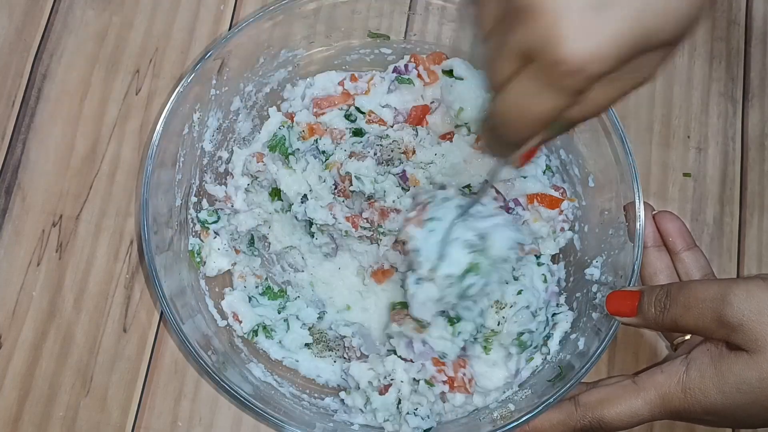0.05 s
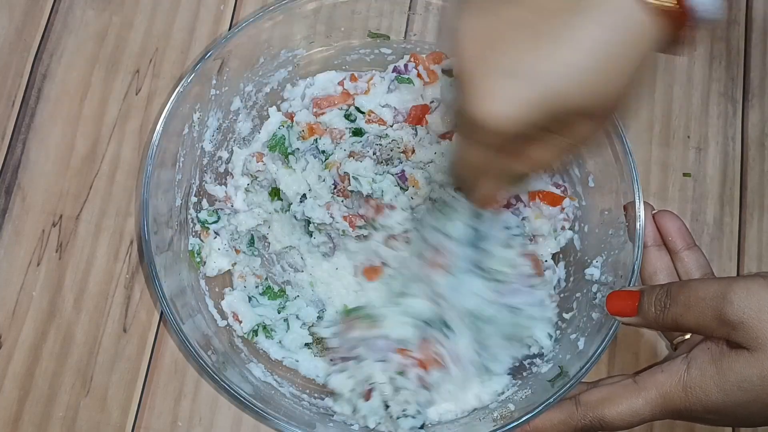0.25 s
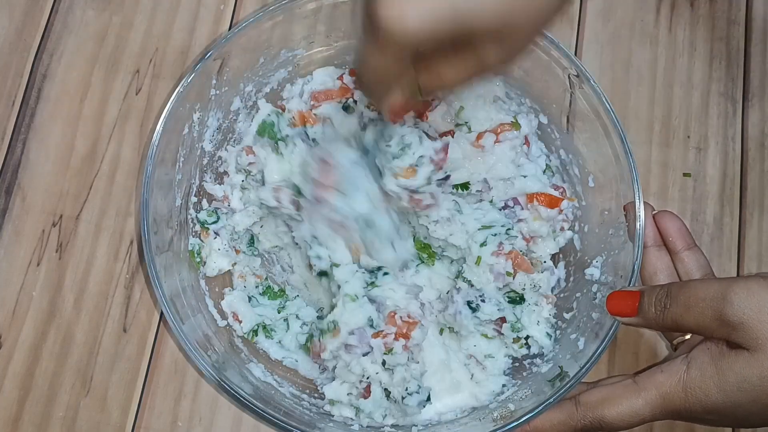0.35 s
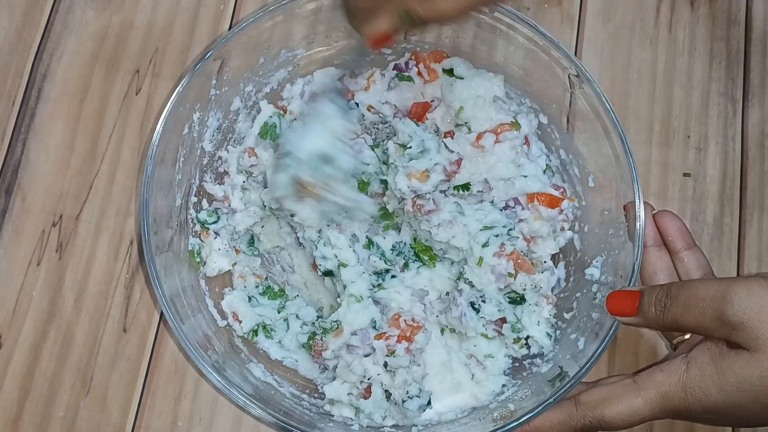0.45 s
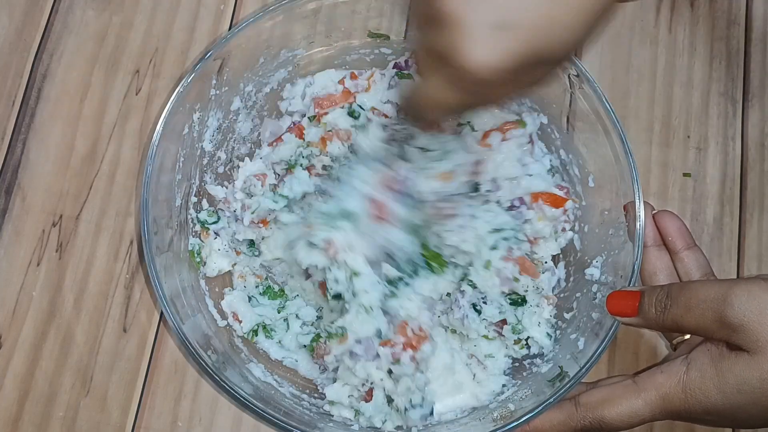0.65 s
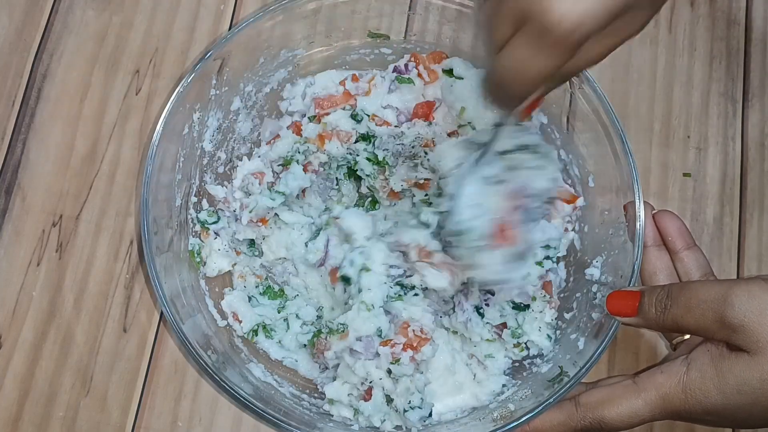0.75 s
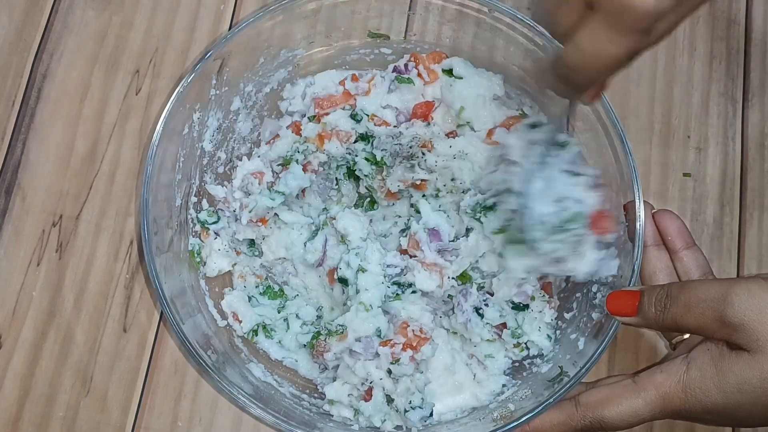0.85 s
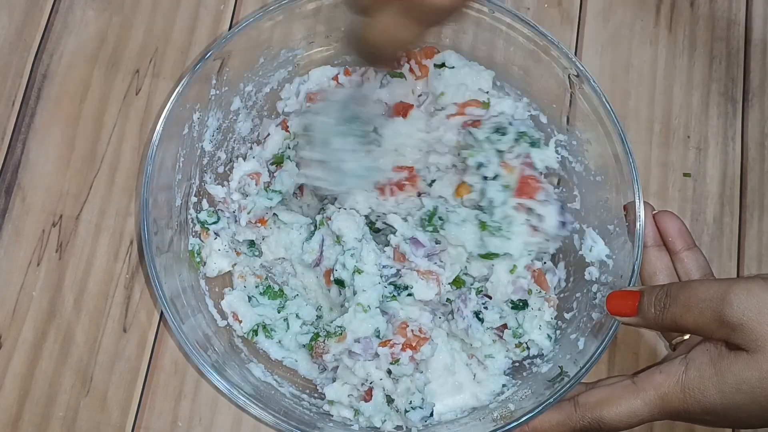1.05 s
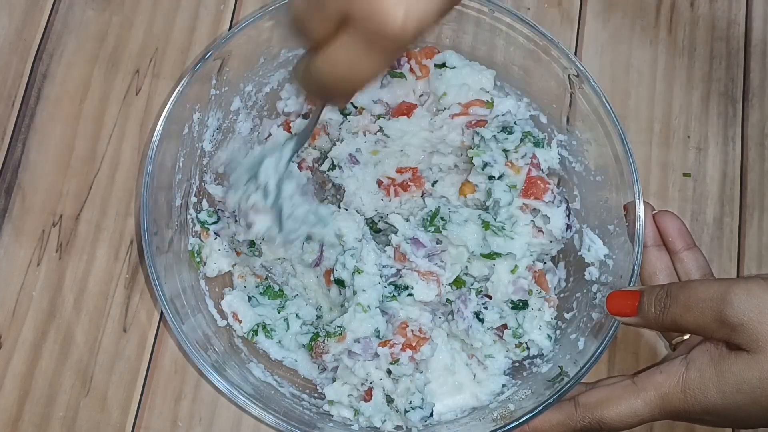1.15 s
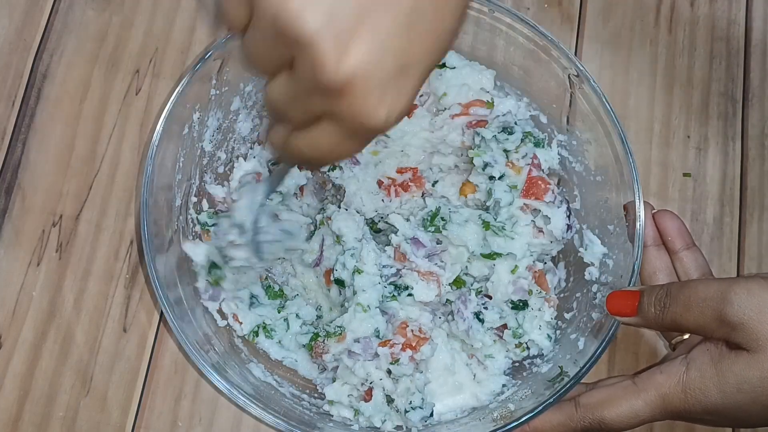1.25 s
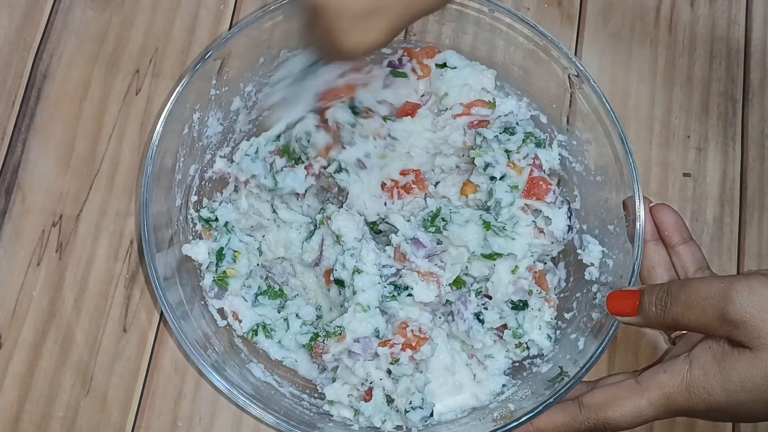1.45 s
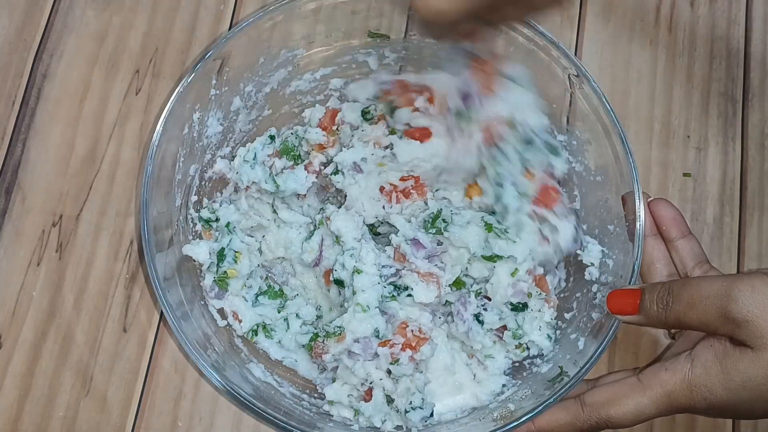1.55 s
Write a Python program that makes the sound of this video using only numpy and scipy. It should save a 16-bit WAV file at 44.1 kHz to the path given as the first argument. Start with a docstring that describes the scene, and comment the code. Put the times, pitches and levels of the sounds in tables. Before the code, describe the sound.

A metal spoon squelches through thick wet batter and clinks against a glass bowl.

```python
"""A metal spoon in thick wet batter and chopped vegetables, in a glass bowl on a wooden table.
The microphone is close above, in a small kitchen. Stirring opens with a squelch; at 0.23 s the
spoon strikes the glass once, hard, and the bowl rings and bumps the table. Soft strokes follow,
tearing wet films and popping air pockets. Around 1 s air gulps in under the lifting spoon;
near the end come more dull bumps and two faint ticks on the glass."""
import sys
import numpy as np
from scipy import signal
from scipy.fft import rfft, irfft
from scipy.io import wavfile

SR = 44100
rng = np.random.default_rng(int(sys.argv[2]) if len(sys.argv) > 2 else 0)


def master_out(mix):
    """Clip the mix to full scale and print it as 16-bit PCM to the path in sys.argv[1]."""
    frames = np.transpose(np.atleast_2d(mix))
    ceiling = np.clip(frames, -1, 1)
    pcm = np.round(ceiling * 32767).astype(np.int16)
    wavfile.write(sys.argv[1], SR, pcm)


N = 70560
T = np.arange(N) / SR

# The kitchen's reverberation. Each row: frequency in Hz, t60 in seconds.
ROOM_DECAY = [(100, 0.28), (500, 0.45), (1500, 0.35), (4000, 0.32), (9000, 0.49), (16000, 1)]
# Noise at the microphone. Each row: frequency in Hz, left-right correlation.
CORRELATION = [(30, .7), (100, 0.0034), (250, 1), (600, 0), (3000, 0.9), (16000, 0)]
# Spectra of room hiss, bowl on wood, squashed and torn batter, the strike and its echo.
# Each row: frequency in Hz, relative density in dB.
HISS_SPECTRUM = [(30, 7), (300, 8.5), (700, 5), (2000, -0.5), (8000, -5.5), (16000, -1)]
RUMBLE_SPECTRUM = [(20, -32.5), (45, -19), (80, -2), (130, -3.5), (180, -14.5), (300, -17), (500, -19.5),
                   (700, -35), (2000, -45), (16000, -75.5)]
SQUELCH_SPECTRUM = [(100, -13), (280, -4.5), (480, -13.5), (750, 0), (1000, -6), (1350, -1.5), (1650, -7),
                    (2050, -2), (3000, -12.5), (5000, -27), (16000, -44)]
CRACKLE_SPECTRUM = [(200, -25), (1500, -22), (2800, 1.5), (4200, -2.5), (6500, -0.5), (7500, -1.5),
                    (8200, -9.5), (11000, -4), (14000, -5), (16000, -5)]
CRACK_SPECTRUM = [(40, -27.5), (120, -9.5), (450, -10.5), (1200, -4.5), (2000, -6), (3500, 7.5),
                  (6000, 2.5), (8000, -2), (10000, 2.5), (16000, -10)]
ECHO_SPECTRUM = [(40, -19), (120, -3.5), (250, 1), (480, -7.5), (1000, -0.5), (2000, -2), (2400, -10),
                 (3300, 1.5), (5300, -10), (7800, -12), (10000, -13.5), (16000, -29)]
# The bowl sliding on the table. Each row: time in seconds, level in dB.
SLIDE_LEVELS = [(0, -52), (.09, -56.5), (.17, -60), (.4, -55), (.5, -67.5), (.56, -61.5), (.63, -65.5),
                (.7, -54), (.9, -55.5), (1.15, -52), (1.2, -58), (1.32, -62.5), (1.45, -50.5), (1.6, -65)]
# The bowl bumping it. Each row: start in seconds, level in dB, pitch in Hz, rise and t60 in seconds.
TABLE_BUMPS = [(0.232, -27.5, 134.3, 0.0015, 0.21), (0.235, -34.5, 82.5, 0.012, 0.45),
               (0.679, -46.5, 88.2, 0.0099, 0.3), (0.772, -49, 81.5, 0.017, 0.61),
               (0.79, -49, 127.6, 0.031, 0.54), (1.1, -28.5, 79.3, 0.037, 0.22),
               (1.406, -33.5, 251, 0.0022, 0.056), (1.406, -41.5, 97.5, 0.0037, 0.36),
               (1.408, -34.5, 137.6, 0.012, 0.27), (1.551, -27, 187, 0.0047, 0.032),
               (1.576, -28.5, 92, 0.032, 0.28)]
# Rubbed glass. Each row: start and length in seconds, level in dB, pitch in Hz.
RUB_TONES = [(0.795, 0.445, -61, 1307), (1.307, 0.11, -61.5, 478)]
# Air drawn under the spoon. Each row: start in seconds, gain in dB.
GULPS = [(0.9135, -40.5), (0.9405, -37.5), (0.997, -37.5), (1.012, -31.5), (1.0257, -28), (1.033, -35.5)]
# Modes of the hollow under the spoon, and of the spoon itself.
# Each row: pitch in Hz, relative level in dB, t60 in seconds, left over right in dB.
HOLLOW_MODES = [(1374, -11, 0.03, 0.0065), (1973, -9.5, 0.059, 0.0068), (2164, -5.5, 0.028, 0)]
SPOON_MODES = [(1883, -12, 0.04, 0), (2960, -18, 0.01, 0.5), (3326, -13.5, 0.013, -1.5),
               (3487, -14, 0.025, 2), (4460, -20.5, 0.0081, -2)]
# Bursting air. Each row: start in seconds, tone gain in dB, pitch in Hz, snap gain in dB.
AIR_POCKETS = [(.006, -29, 4400, -39.5), (0.079, -41.5, 2700, -73), (.175, -38, 10100, -48),
               (0.349, -24, 3000, -51), (0.396, -35.5, 5360, -40.5), (0.4218, -27.5, 10300, -34.5),
               (0.4608, -23.5, 5920, -35.5), (.469, -23, 6500, -42), (0.549, -27.5, 5170, -68),
               (0.6322, -34.5, 6200, -45), (0.65, -69.5, 5450, -39), (0.6661, -34.5, 2034, -55),
               (0.687, -29, 8300, -48), (0.7136, -40, 1260, -36.5), (0.7445, -28.5, 1530, -39),
               (0.7504, -32.5, 4010, -41), (0.913, -33, 4900, -44), (.981, -37, 6400, -60.5),
               (.989, -37, 8700, -43), (1.01, -37.5, 5300, -39), (1.026, -25, 2840, -54),
               (1.087, -28.5, 6450, -43), (1.357, -35.5, 5350, -54), (1.4047, -27.5, 2620, -33),
               (1.445, -26, 2750, -53), (1.495, -31.5, 6600, -53), (1.536, -28, 4000, -38),
               (1.5515, -29, 1380, -32.5), (1.563, -35, 1370, -53), (1.567, -32.5, 700, -54),
               (1.586, -58, 2280, -29.5), (1.59, -32, 6600, -45)]
# The stirring. Each row: time in seconds, relative levels of squelch and crackle in dB.
STROKES = [(0, -48, -42.5), (.07, -55, -55.5), (.15, -65.5, -70), (0.199, -69, -57.5), (.3, -48, -38.5),
           (0.417, -51.5, -61), (0.52, -76.5, -66), (0.598, -66, -62), (0.643, -74, -65),
           (0.664, -51.5, -43), (0.688, -42.5, -43.5), (.755, -44, -43), (.81, -57.5, -52),
           (0.845, -64, -76), (0.889, -68, -69), (.94, -58, -48), (0.981, -78, -61.5), (1.028, -51, -36),
           (1.059, -50.5, -46), (1.103, -55.5, -48.5), (1.148, -63, -76), (1.231, -78.5, -103.5),
           (1.349, -98.5, -79), (1.359, -65, -53), (1.398, -71, -52.5), (1.409, -43.5, -52),
           (1.451, -58, -43), (1.519, -54.5, -48.5), (1.566, -42.5, -41.5), (1.6, -44, -58)]
# The glass bowl, one entry a mode: pitch in Hz, relative level in dB, left over right in dB.
BOWL_MODE_HZ = [620, 778, 1243, 1920, 1992, 2853, 3768, 3836, 4814, 4955, 5030, 6298, 7214, 7780, 8450,
                8720, 9280, 9720, 10410, 11400, 12170, 12590, 12940, 14170, 14930]
BOWL_MODE_DB = [-35, -28, -22, -21, -16.5, -18.5, -22, -14.5, -25.5, -21.5, -10, -17.5, -32.5, -30.5, -35,
                -31, -30, -25, -24, -32.5, -36, -29, -34, -32.5, -34]
BOWL_MODE_PAN_DB = [2.5, -3, 2, 4, -3, -3, 4, 4.5, 3, 0.5, 0.5, -3.5, 0.5, 8, -2, -0.5, -2.5, -4, 1.5, 1,
                    -1, 3.5, -4, 0.5, 2.5]
# Spoon on glass; the first two contacts are heard as one strike.
# Each row: start in seconds, gains of crack, bowl and spoon in dB.
CONTACTS = [(.2289, -11.5, -14, -1), (.2322, -12.5, -0.5, -7), (1.405, -49, -39, -42),
            (1.563, -56, -33, -52)]


def amp(db):
    """Decibels to gain."""
    return 10 ** (np.asarray(db) / 20)


def unit(x):
    """Scales to rms 1."""
    return x / np.sqrt(np.mean(x ** 2) + 1e-20)


def decay(t60, t=T):
    """An envelope falling 60 dB in t60 seconds."""
    return np.exp(-np.log(1000) * t / t60)


def read(points, hz):
    """Reads a curve on a log-frequency axis."""
    f, value = np.transpose(points)
    return np.interp(np.log(hz + 1), np.log(f + 1), value)


def pan(db):
    """Left and right gains, db apart."""
    return amp(np.array([[.5], [-.5]]) * db)


def add(mix, start, sound):
    """Mixes a sound in at start seconds."""
    part = mix[..., max(round(start * SR), 0):][..., :sound.shape[-1]]
    part += sound[..., :part.shape[-1]]


def colour(x, spectrum):
    """Minimum-phase filter with the given spectrum; result at rms 1."""
    log_gain = np.log(amp(read(spectrum, abs(np.fft.fftfreq(4096, 1 / SR)))))
    taps = np.fft.ifft(np.exp(np.conj(signal.hilbert(log_gain)))).real[:2048]
    return unit(signal.fftconvolve(x, taps)[:N])


def noise(spectrum):
    """Stereo noise, its two sides more alike in some bands than in others."""
    hz = np.fft.rfftfreq(N, 1 / SR)
    left, other = rfft(rng.standard_normal((2, N)))
    alike = np.clip(read(CORRELATION, hz), -1, 1)
    right = alike * left + np.sqrt(1 - alike ** 2) * other
    return unit(irfft(np.array([left, right]) * amp(read(spectrum, hz)), N))


def flutter(steady, width_hz, size=N):
    """Random wavering of a tone's strength and phase on each side; steady (0-1) is the fixed part."""
    waver = rng.standard_normal((2, size)) + 1j * rng.standard_normal((2, size))
    waver = np.fft.ifft(waver / (1 + (np.fft.fftfreq(size, 1 / SR) / width_hz) ** 2))
    steady = np.clip(steady, 0, 1)
    return steady + np.sqrt(1 - steady ** 2) * waver / np.sqrt(np.mean(abs(waver) ** 2))


def ring(modes, blur_s=.025, lag_rad=1.26):
    """Dying tones that start clean, take on a shimmer, and reach the two sides out of step."""
    out, t = np.zeros((2, N)), T[:SR // 2]
    steady = .52 + .48 * np.exp(-t / blur_s)
    for k, (hz, db, t60, side_db) in enumerate(modes):
        phase = 2 * np.pi * hz * t + np.array([[.5], [-.5]]) * lag_rad * (-1) ** k
        tone = (flutter(steady, width_hz=55, size=len(t)) * np.exp(1j * phase)).imag
        polarity = (-1) ** (k // 2)
        add(out, 0, tone * polarity * amp(db) * decay(t60, t) * pan(side_db))
    return out


def die_away(x):
    """Lets each band fade at the speed of the room."""
    hz, t, bands = signal.stft(x, SR, nperseg=256)
    fade = amp(-60 * t / read(ROOM_DECAY, hz)[:, None])
    return signal.istft(bands * fade, SR, nperseg=256)[1][:, :N]


def kitchen(x, build_s=0.012):
    """The small room's diffuse reverberation."""
    tail = die_away(rng.standard_normal((2, N))) * np.minimum(T / build_s, 1)
    return signal.fftconvolve(x, unit(tail) / np.sqrt(N), axes=1)[:, :N]


def rubbed_glass():
    """Sliding contact draws faint swelling tones from the bowl."""
    out = np.zeros((2, N))
    for start, length, db, hz in RUB_TONES:
        swell = np.sin(np.pi * np.clip((T - start) / length, 0, 1))
        tone = (flutter(steady=0.62, width_hz=45) * np.exp(2j * np.pi * hz * T)).real
        out += amp(db) * swell * tone
    return out


def bowl_on_table():
    """The pushed bowl rubs and bumps on the wooden top."""
    out = noise(RUMBLE_SPECTRUM) * amp(np.interp(T, *np.transpose(SLIDE_LEVELS)))
    for start, db, hz, rise, t60 in TABLE_BUMPS:
        envelope = (1 - np.exp(-T / rise)) * decay(t60)
        add(out, start, amp(db) * np.sin(2 * np.pi * hz * T) * envelope)
    return out


def bowl_walls(x, wall_db, fade_s=0.0039, size=1024):
    """The glass throws quick reflections, different to each side and changing as the spoon moves."""
    echoes, window = np.zeros((2, N)), np.sqrt(np.hanning(size))
    for at in range(0, N, size // 2):
        piece = x[at:at + size] * window[:N - at]
        taps = unit(rng.standard_normal((2, size)) * np.exp(-T[:size] / fade_s)) / np.sqrt(size)
        add(echoes, at / SR, signal.fftconvolve(piece[None], taps, axes=1))
    return (x + amp(wall_db) * echoes) / np.hypot(1, amp(wall_db)) * pan(db=0.6)


def sucking():
    """The lifting spoon lets air into the hollow beneath it, which rings at each gulp."""
    out, hollow = np.zeros((2, N)), ring(HOLLOW_MODES)
    for start, db in GULPS:
        add(out, start, amp(db) * hollow)
    return out


def pops(decay_cycles=1.5, glide=0.009, rise_s=0.0002, snap_s=0.0027):
    """An air pocket snaps open, sputters, and its cavity rings a few cycles, rising slightly in pitch."""
    out, t = np.zeros(N), T[:1024]
    low_cut = signal.butter(1, 1196, "highpass", fs=SR)
    for start, db, hz, snap_db in AIR_POCKETS:
        sputter, snap = rng.standard_normal((2, len(t))) * np.exp(-t / snap_s)
        snap = signal.lfilter(*low_cut, snap)
        age = t * hz / decay_cycles
        pitch = hz * (1 + glide * (np.minimum(age, 2) - .5))
        envelope = np.exp(-age) * (1 - np.exp(-t / rise_s))
        cavity = np.sin(2 * np.pi * np.cumsum(pitch) / SR) * envelope
        drive = (t == 0) + 0.25 * sputter / np.linalg.norm(sputter)
        tone = signal.fftconvolve(drive, cavity)[:len(t)]
        add(out, start, amp(db) * tone / abs(tone).max() * 1.007 + amp(snap_db) * snap)
    return out


def tearing(per_s, spread_db):
    """Tiny wet films breaking at random, a few larger than the rest."""
    size = amp(spread_db * np.minimum(rng.exponential(1, N), 5))
    return size * rng.choice([-1, 1], N) * (rng.random(N) < per_s / SR)


def stirring():
    """Each stroke squashes the batter (squelch) and tears it from spoon and glass (crackle)."""
    times, squelch_db, crackle_db = np.transpose(STROKES)
    squelch = colour(tearing(per_s=8200, spread_db=2.5), SQUELCH_SPECTRUM)
    crackle = colour(tearing(per_s=5000, spread_db=4.5), CRACKLE_SPECTRUM)
    squelch *= amp(np.interp(T, times, squelch_db) - 2.5)
    crackle *= amp(np.interp(T, times, crackle_db) - 2)
    return squelch + crackle


def clink(bowl_rise_s=0.00088, echo_rise_s=.004, echo_db=-16.5, room_db=-22):
    """Spoon hits glass: a crack, a short ring of the spoon, a longer one of the bowl, the room's echo."""
    glass, out = np.zeros((2, N)), np.zeros((2, N))
    t60 = .27 * (np.array(BOWL_MODE_HZ) / BOWL_MODE_HZ[0]) ** -.13  # higher modes die sooner
    bowl = ring(zip(BOWL_MODE_HZ, BOWL_MODE_DB, t60, BOWL_MODE_PAN_DB))
    bowl *= 1 - np.exp(-T / bowl_rise_s)
    spoon = ring(SPOON_MODES)
    for start, crack_db, bowl_db, spoon_db in CONTACTS:
        crack = noise(CRACK_SPECTRUM) * decay(t60=0.055)
        echo = die_away(noise(ECHO_SPECTRUM)) * amp(echo_db) * (1 - np.exp(-T / echo_rise_s))
        add(out, start, amp(crack_db) * (crack + echo) + amp(spoon_db) * spoon)
        add(glass, start, amp(bowl_db) * bowl)
    return out + glass + amp(room_db) * kitchen(glass)


def scene(room_db=-8.5, hiss_db=-71.5):
    """Batter, glass and table close under the microphone, the kitchen's faint hiss behind them."""
    batter = bowl_walls(stirring(), wall_db=6) + bowl_walls(pops(), wall_db=3) + sucking()
    batter += amp(room_db) * kitchen(batter)
    return batter + clink() + bowl_on_table() + rubbed_glass() + amp(hiss_db) * noise(HISS_SPECTRUM)


def record(dry, edge_hz=16050):
    """The strike just overloads the microphone input; a low-pass then cuts the top of the treble."""
    low_pass = signal.firwin(301, edge_hz, window=("kaiser", 8), fs=SR)
    return signal.oaconvolve(np.clip(dry, -1, 1), low_pass[None], "same")


dry = scene()
out = record(dry)
master_out(out)
```